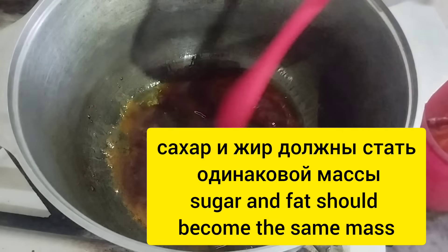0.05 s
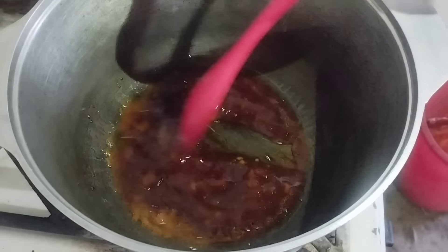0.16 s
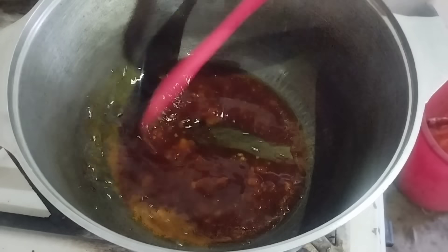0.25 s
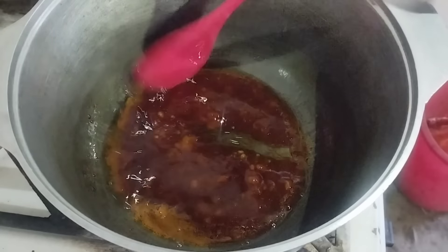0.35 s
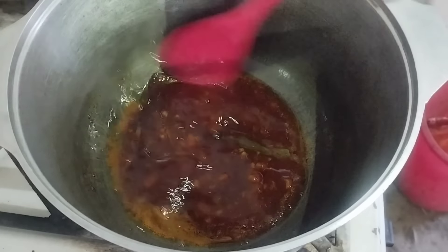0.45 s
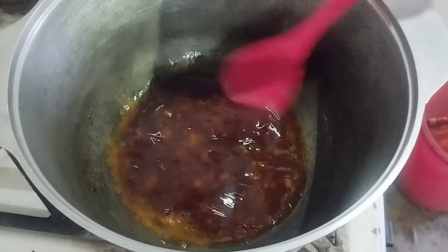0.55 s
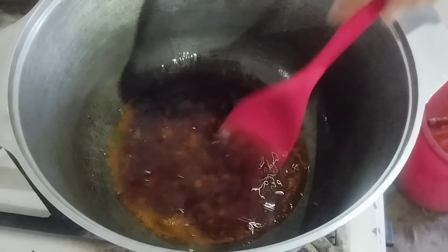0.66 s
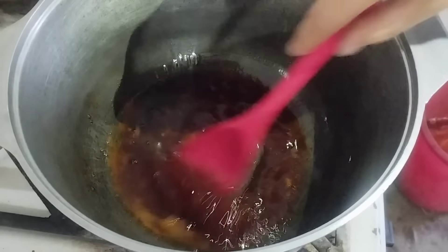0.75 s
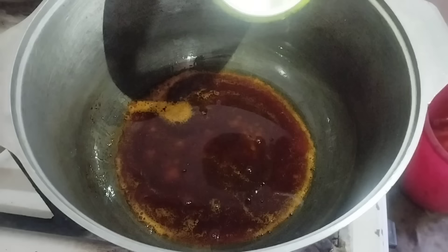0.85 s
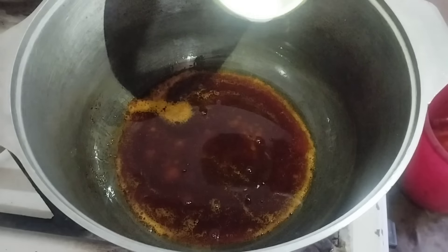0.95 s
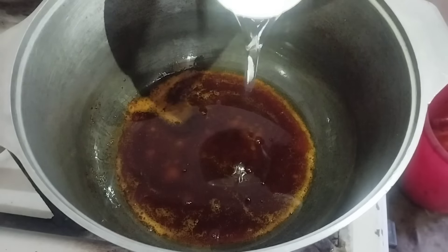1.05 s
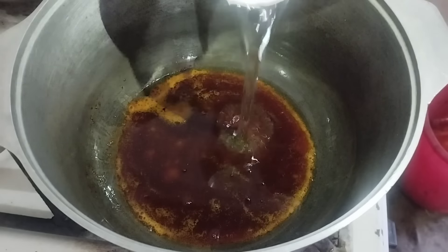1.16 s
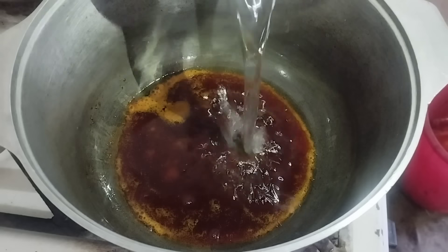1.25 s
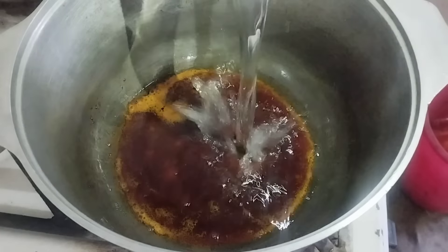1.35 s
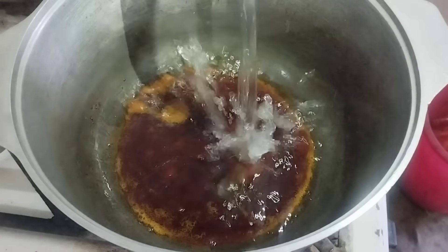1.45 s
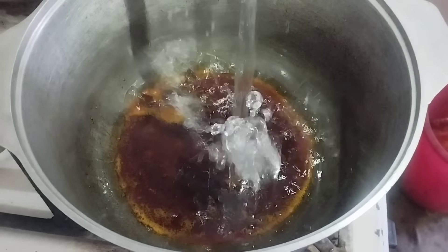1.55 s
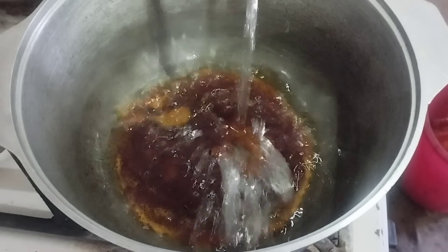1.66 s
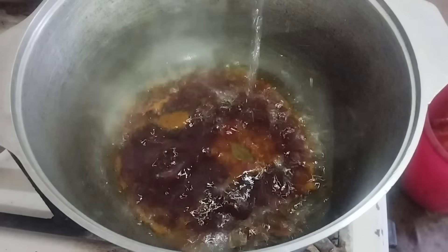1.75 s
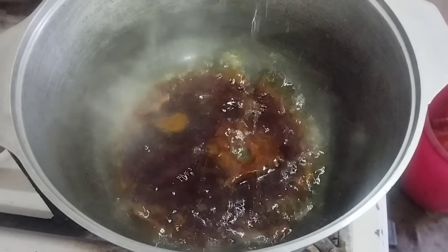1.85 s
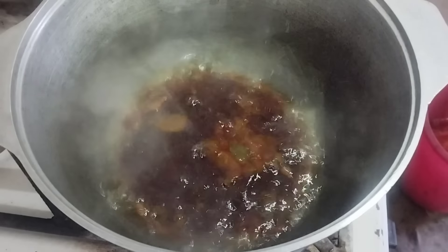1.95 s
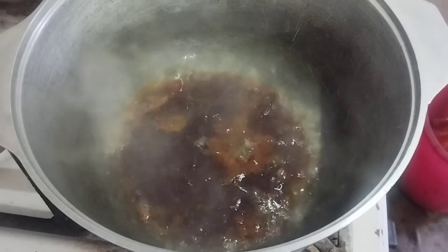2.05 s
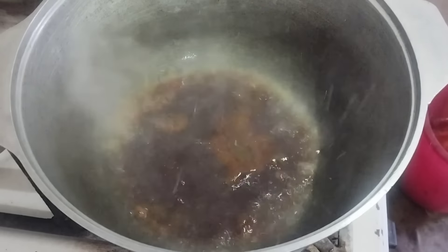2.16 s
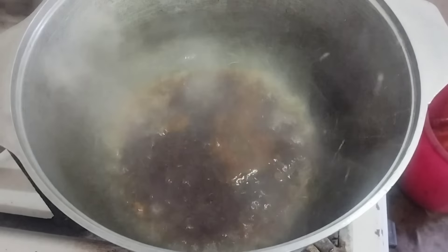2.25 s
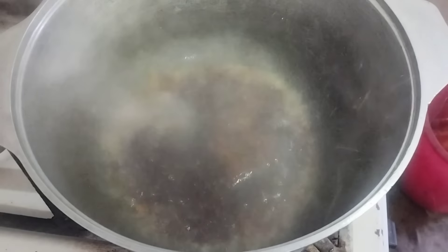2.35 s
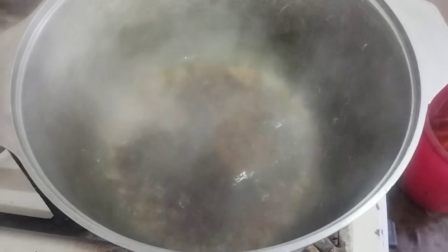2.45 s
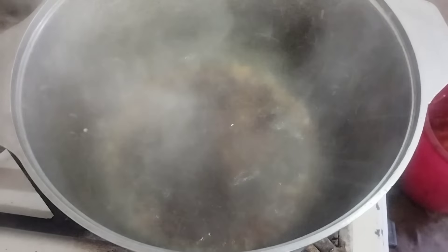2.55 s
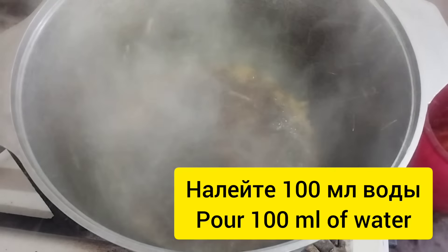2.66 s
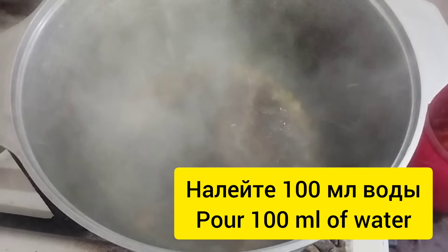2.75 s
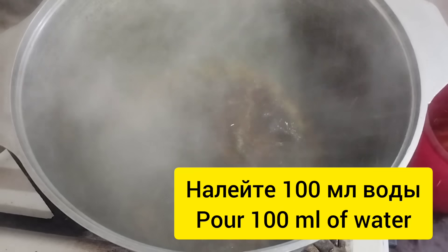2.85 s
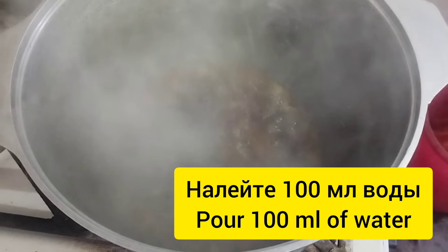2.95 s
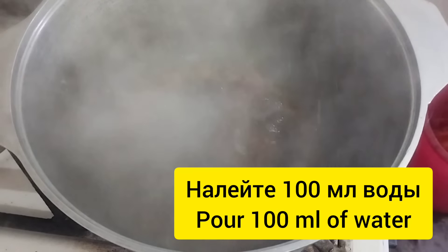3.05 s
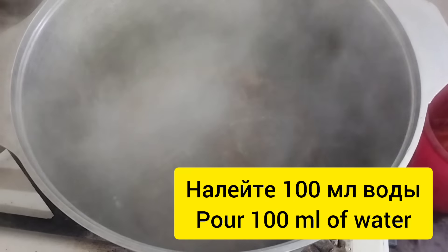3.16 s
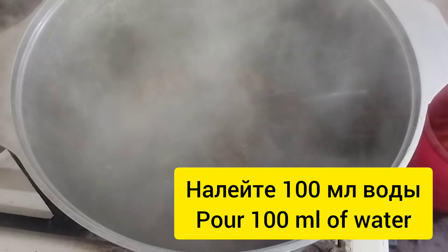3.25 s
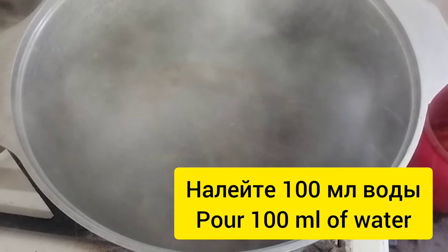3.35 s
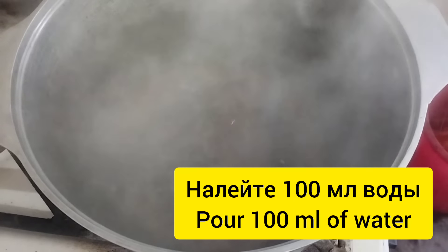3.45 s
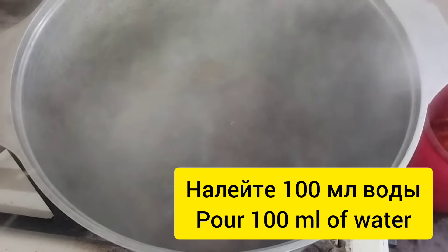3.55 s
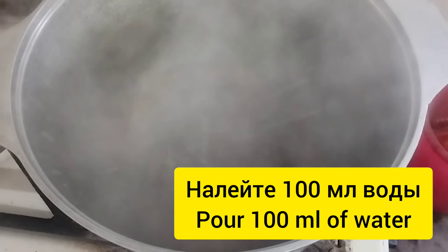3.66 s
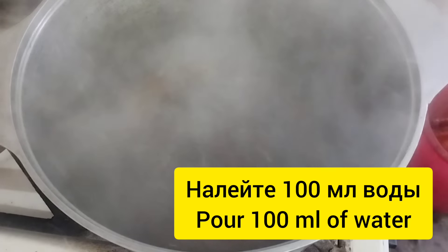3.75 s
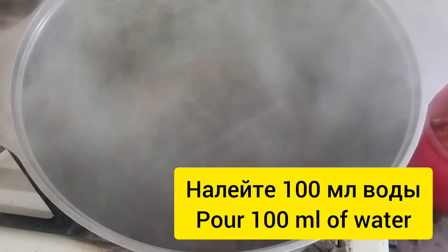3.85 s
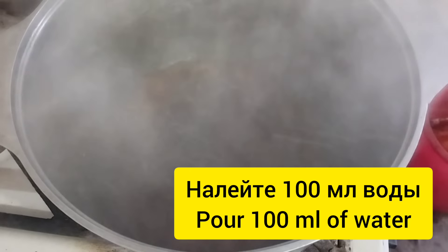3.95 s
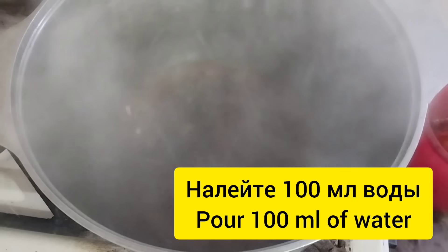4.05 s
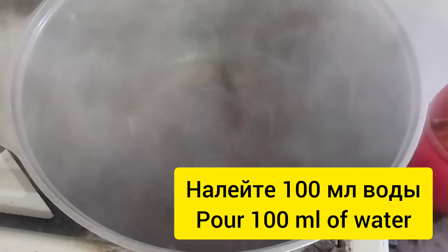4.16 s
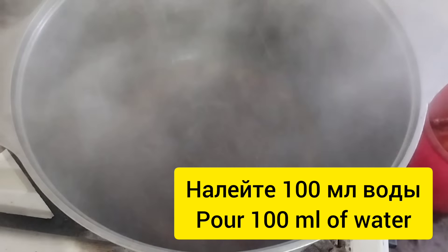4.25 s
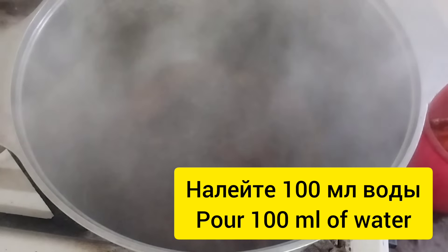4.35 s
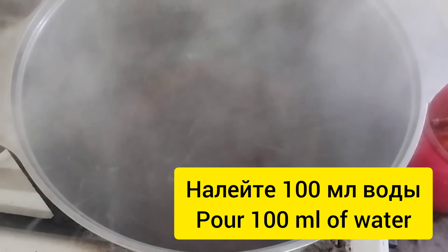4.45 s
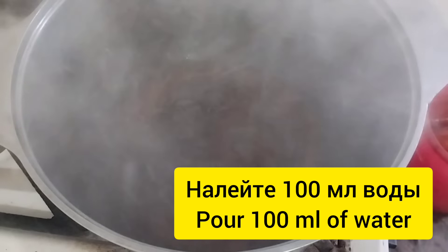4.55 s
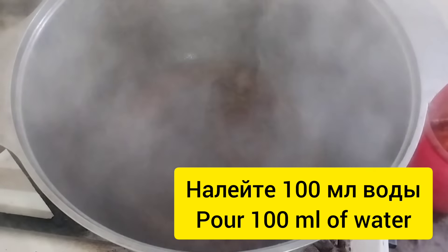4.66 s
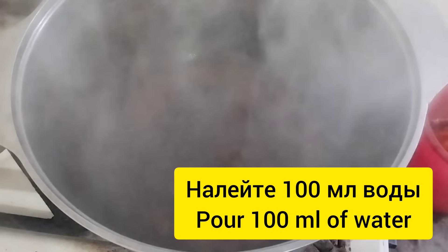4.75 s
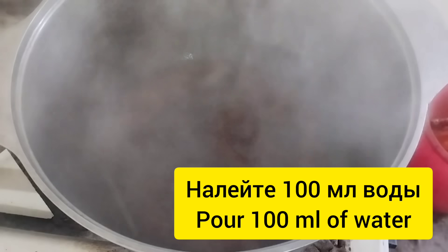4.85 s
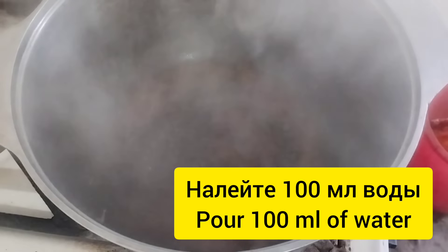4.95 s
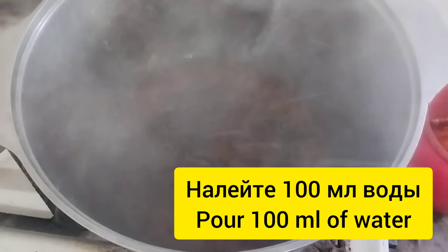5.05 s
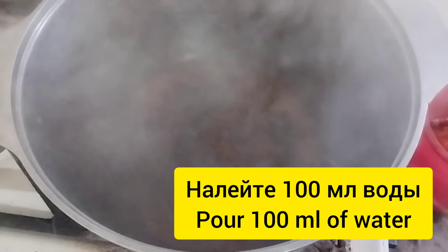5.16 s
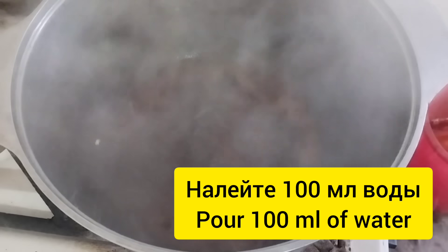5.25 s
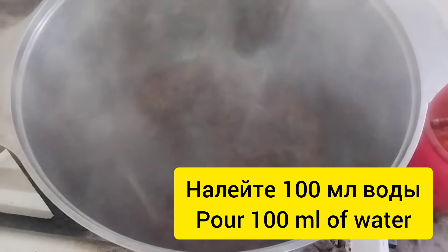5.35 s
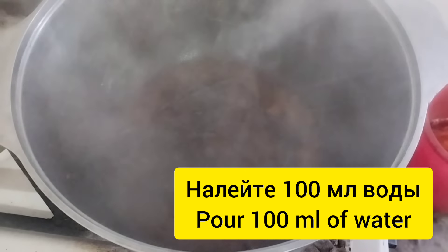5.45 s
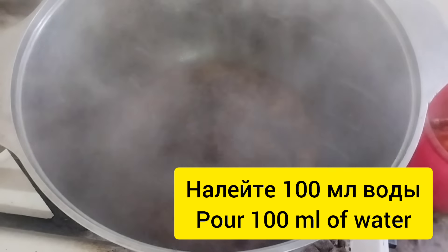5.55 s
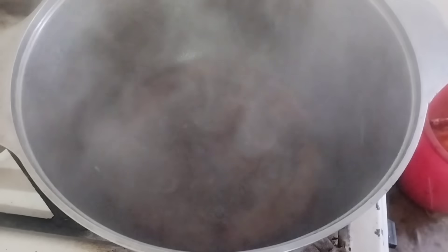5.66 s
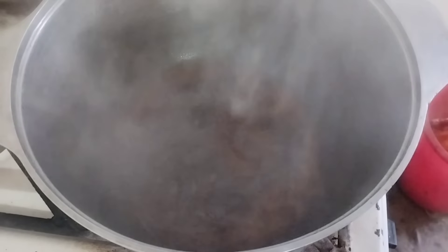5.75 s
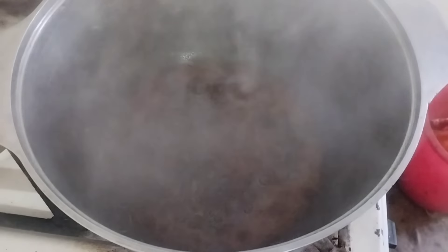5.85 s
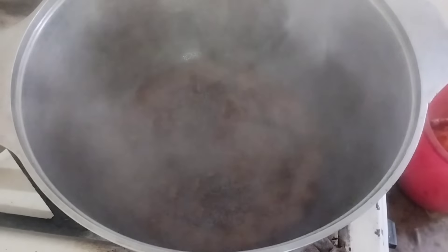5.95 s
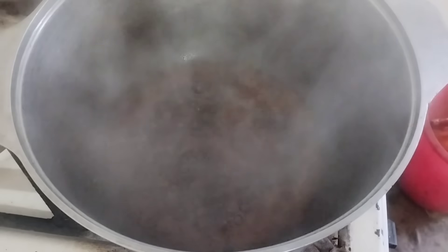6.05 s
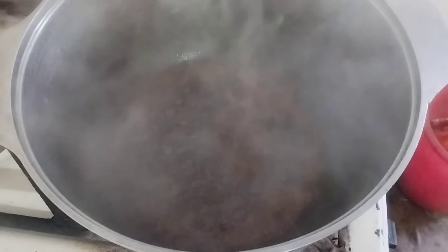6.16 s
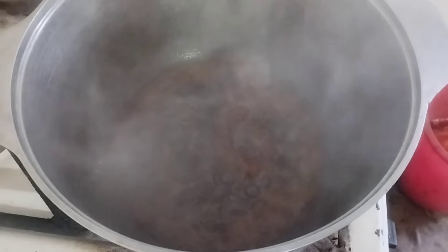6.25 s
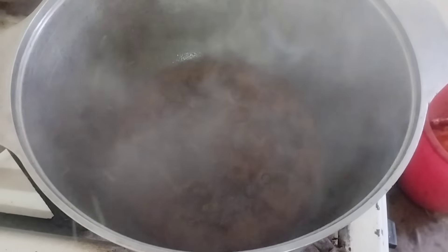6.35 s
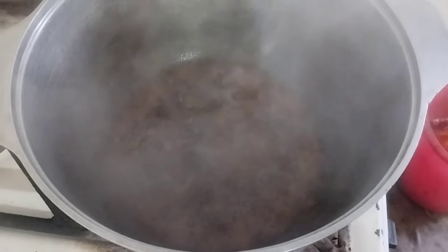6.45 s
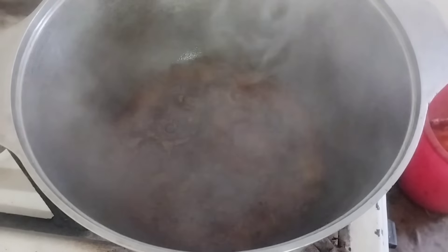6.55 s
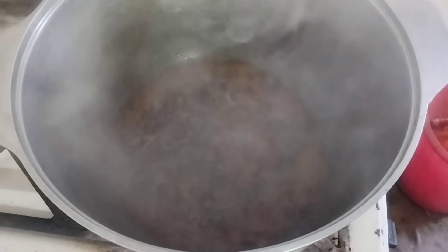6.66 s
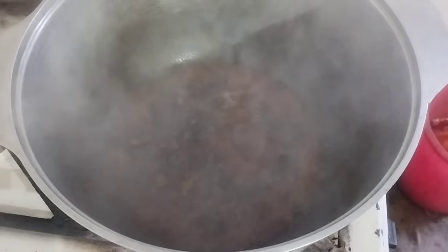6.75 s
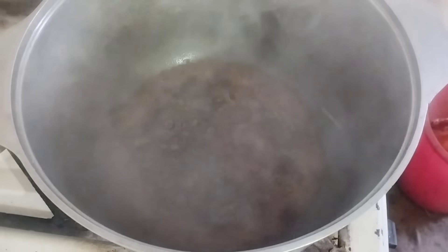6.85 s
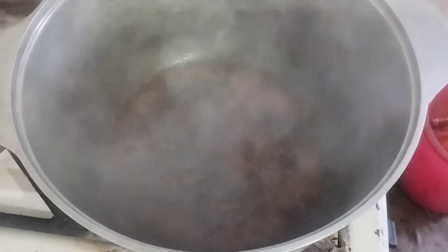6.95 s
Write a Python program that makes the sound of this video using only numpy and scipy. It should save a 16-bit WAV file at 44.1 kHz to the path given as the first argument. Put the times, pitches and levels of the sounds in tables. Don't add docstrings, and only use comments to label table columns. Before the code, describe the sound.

A quiet kitchen hums faintly, a spoon barely brushing a pot. Just after one second, water hits hot syrup and oil: sharp spits, a brief hollow metallic splash, then dense loud sizzling. Sharp pops, crackle and a few low bloops follow. The close stereo microphone, struck by steam, gives abrupt thumps mostly on the left, and loud peaks briefly dip the level.

```python
import sys
import numpy as np
from scipy import signal
from scipy.fft import rfft, irfft, next_fast_len
from scipy.io import wavfile
from scipy.ndimage import uniform_filter1d, minimum_filter1d

SR = 44100
rng = np.random.default_rng(int(sys.argv[2]) if len(sys.argv) > 2 else 0)


def how_loud(loudness_db):
    steps = np.asarray(loudness_db, float) / 20
    return 10 ** steps


def master_out(mix):
    frames = np.transpose(np.atleast_2d(mix))
    ceiling = np.clip(frames, -1, 1)
    pcm = np.round(ceiling * 32767).astype(np.int16)
    wavfile.write(sys.argv[1], SR, pcm)


N = 309141
RIGHT_LAG = 8

# (time [s], fizz level [dB], boil level [dB])
HEAT = [(1.19, -79, -70), (1.225, -62, -77), (1.249, -35.5, -64), (1.31, -47, -77), (1.33, -42.5, -56),
        (1.45, -38.5, -68), (1.5, -32, -38), (1.59, -24, -36.5), (1.69, -27.5, -38.5), (1.79, -24.5, -36.5),
        (2.25, -21.5, -31.5), (3.0, -24, -31), (3.6, -25, -35), (4.15, -27, -35.5), (5.0, -25.5, -35),
        (5.8, -25, -35), (6.3, -25.5, -35), (7.01, -24.5, -37)]
# (frequency [Hz], level [dB])
FIZZ_SPECTRUM = [(30, -2.5), (100, -16), (300, -10.5), (900, -7), (1600, -2.5), (2100, -2.5), (3000, 1),
                 (5000, 1.5), (16000, -3.5)]
# (frequency [Hz], width [Hz], level [dB])
POT_MODES = [(398, 8, 2), (569, 57, 5), (624.4, 38, 7), (763, 340, -1), (1230, 280, -2), (1968, 70, 4),
             (1635, 52, -4)]
# (time [s], peak level [dB], pitch [Hz], pot thump minus peak [dB])
SPITS = [(1.1982, -45, 6210, -36), (1.2174, -53, 3100, -25), (1.225, -40, 5300, -35),
         (1.2363, -33, 5700, -27), (1.2511, -44, 5260, -32), (1.282, -32, 4910, -34),
         (1.3022, -24.5, 5400, -48), (1.3214, -43, 4610, -7), (1.3404, -33, 5450, -30),
         (1.3524, -49, 4570, -28), (1.3652, -32, 4520, -17), (1.374, -38, 5950, -21),
         (1.3931, -34, 6890, -11), (1.4034, -35, 3360, -31), (1.4146, -31, 4600, -22),
         (1.485, -30, 4710, -15), (1.5357, -28, 2680, -24), (1.5488, -23, 2710, -23)]
# (time [s], peak level [dB], pitch [Hz], pot thump minus peak [dB])
POPS = [(1.9455, -14, 3400, -17), (2.3376, -16, 5700, -5), (2.5401, -13, 4600, -10),
        (2.6434, -20, 5640, -20), (2.815, -16, 4240, -5.5), (3.1173, -19, 6230, 0.5),
        (3.1577, -14, 4600, -14), (3.1827, -11.5, 4760, -10), (3.2081, -15, 4400, -15),
        (3.258, -24.5, 5800, 1.5), (3.2798, -20.5, 5700, -13), (3.4905, -21.5, 5600, 0.5),
        (3.6137, -26.5, 5600, 1), (3.7064, -24, 3660, -5.5), (3.8511, -17, 5800, -1),
        (3.9918, -22, 5040, -1.5), (4.0427, -22.5, 5120, 3.5), (4.0826, -12.5, 4970, -11.5),
        (4.2702, -19, 5500, -13), (4.3994, -14, 5140, -21), (4.4194, -19, 4270, -3.5),
        (4.4962, -12, 4360, -17), (4.5084, -23.5, 4370, 5), (4.5296, -18, 5100, -14),
        (5.0095, -14.5, 5060, -6), (5.2155, -24, 5360, -2), (5.4186, -19.5, 5200, -6),
        (5.7434, -31, 4360, 2.5), (5.7788, -23.5, 6160, 2), (6.1194, -18, 5130, -5)]
# (time [s], size [full scale])
SNAPS_IN = [(1.8748, .3), (2.0127, .6), (2.2476, .43), (2.2866, .6), (2.2929, .22), (2.3165, .72),
            (2.3392, .14), (2.4068, .14), (2.4458, .14), (2.5065, .57), (2.541, .74), (2.6771, .73),
            (2.751, .22), (2.7668, .96), (2.8195, .56), (2.9396, .2), (2.9573, .18), (2.9782, .56),
            (3.004, .59), (3.1192, .9), (3.2589, .56), (3.3868, .54), (3.9659, .18), (3.9932, .77),
            (4.0285, .5), (4.1623, .13), (4.5501, .23), (4.8825, .68), (5.2784, .84), (6.3886, .62)]
# (time [s], size [full scale])
SNAPS_OUT = [(2.0303, .09), (2.253, .14), (2.2621, .85), (2.3514, .15), (2.4371, .3), (2.5174, .23),
             (2.6956, .15), (2.7079, .49), (2.7378, .25), (2.7718, 1.02), (2.8458, .22), (2.946, .32),
             (2.9941, .12), (3.0104, .49), (3.0181, .14), (3.0254, .18), (3.0331, .2), (3.1573, .25),
             (3.2757, .79), (3.4054, .33), (3.936, .75), (4.0344, .38), (4.4449, 1.12), (4.7495, .12),
             (4.9405, .34), (5.3877, .16)]
# (time [s], signed size [full scale])
JUMPS_RIGHT = [
    (2.5415, -0.23),
    (4.0829, 0.1),
]
# (time [s], wall level [dB], wall pitch [Hz], cavity level [dB], cavity pitch [Hz])
POUR = [
    (1.34, -61, 1140, -72, 566),
    (1.402, -67, 1140, -29, 544),
    (1.5, -69, 1100, -32.5, 520),
    (1.528, -26, 1120, -30, 563),
    (1.574, -30, 1100, -21.5, 630),
    (1.634, -42, 1130, -48, 540),
    (1.74, -28, 1170, -28, 583),
    (1.774, -32, 1150, -38, 600),
    (2.0, -49, 1230, -29.5, 650),
]
# (time [s], peak level [dB], pitch [Hz])
BLOOPS = [
    (2.944, -18, 417),
    (3.112, -11.5, 255),
    (5.301, -20.5, 336),
    (5.328, -23, 346),
    (5.563, -18.5, 327),
    (5.586, -21, 340),
    (5.594, -40, 398),
]
# (time [s], level [dB])
STIR = [
    (0.07, -78),
    (0.134, -63),
    (0.192, -84),
    (0.198, -75),
    (0.24, -91),
]
# (frequency [Hz], width [Hz], level [dB])
DRONE = [(66, 21, -62), (355, 26, -68), (1770, 60, -79)]
# (frequency [Hz], level [dB])
HUM_SPECTRUM = [(20, 1), (65, -7), (120, -10), (250, -14.5), (370, -13), (550, -22), (1500, -32),
                (1800, -32), (2200, -32.5), (5500, -38.5), (6300, -31.5), (7200, -38.5), (12000, -42.5),
                (15500, -40)]
# (frequency [Hz], shared power [0 to 1])
LIKENESS = [(170, 0.65), (700, 0.98), (1200, 0.98), (2200, 0.04), (3000, 0.046), (16000, 0.054)]
# (frequency [Hz], level [dB])
PORT_LEFT = [(3000, 2.5), (5200, 2.5), (6800, 2), (7700, -2), (8150, -21.5), (8700, -1), (9600, 3),
             (11300, 1.5), (12500, 8), (15500, 11)]
# (frequency [Hz], level [dB])
PORT_RIGHT = [(3000, 1.5), (5200, 5.5), (6800, 4.5), (7700, -0.5), (8150, -4), (8700, -4), (9600, -7),
              (10800, -11), (11300, -34), (11900, -2.5), (15500, 7)]


def evened(x):
    return x / np.sqrt(np.mean(x ** 2) + 1e-20)


def read(points, hz):
    f, value = np.transpose(points)
    return np.interp(np.log(hz + 1), np.log(f + 1), value)


def colour(x, points):
    log_gain = np.log(how_loud(read(points, abs(np.fft.fftfreq(4096, 1 / SR)))))
    spectrum = np.exp(np.conj(signal.hilbert(log_gain)))
    taps = np.fft.ifft(spectrum).real[:2048]
    return signal.oaconvolve(x, taps)[:N]


def pair(x):
    size = next_fast_len(N)
    same = np.clip(read(LIKENESS, np.fft.rfftfreq(size, 1 / SR)), 0, 1)
    z = rfft(x, size)
    return irfft(np.sqrt(same) * z[0] + np.sqrt(1 - same) * z[1:], size)[:, :N]


def clicks(per_s, spread_db, channels):
    size = how_loud(spread_db * np.minimum(rng.exponential(1, (channels, N)), 4))
    return size * (rng.random((channels, N)) < per_s / SR)


def fade(x, ms):
    r = np.exp(-1000 / (ms * SR))
    return signal.lfilter([1 - r], [1, -r], x)


def slow_noise(ms):
    return evened(fade(fade(rng.standard_normal(N), ms), ms))


def gain_curve(s, db):
    return how_loud(np.interp(np.arange(N) / SR, s, db, left=-120, right=-120))


def pot(x):
    out = 0
    for hz, width, db in POT_MODES:
        pole = np.exp((-np.pi * width + 2j * np.pi * hz) / SR)
        out = out + how_loud(db) * 2 * signal.lfilter([1 - abs(pole)], [1, -pole], x).imag
    return signal.sosfilt(signal.butter(2, 220, "high", fs=SR, output="sos"), out)


def ring(hz, ms):
    turn = np.exp(2j * np.pi * np.cumsum(hz) / SR)
    noise = pair(rng.standard_normal((3, N)))
    return evened((turn * fade(fade(noise / turn, ms), ms)).real)


def fizz():
    s, db, boil_db = np.transpose(HEAT)
    flares = fade(clicks(440, 4.0, channels=1)[0] ** 2, 6.0)
    power = (1 + 0.5 * flares / flares.mean()) * how_loud(0.6 * slow_noise(3.6))
    hiss = pair(rng.standard_normal((3, N))) * np.sqrt(power)
    hiss = evened(np.array([colour(x, FIZZ_SPECTRUM) for x in hiss]))
    body = signal.lfilter(*signal.butter(1, 1800, fs=SR), hiss)
    fullness = gain_curve(s, np.clip(0.69 * (boil_db - db + 9.0), -12, 0))
    return gain_curve(s, db + 2.5) * (hiss - (1 - fullness) * body)


def boil():
    s, _, db = np.transpose(HEAT)
    knocks = clicks(700, 2.5, channels=3) * rng.standard_normal((3, N))
    swell = how_loud(1.2 * slow_noise(30.0))
    blows = evened(knocks) + 0.78 * rng.standard_normal((3, N))
    return gain_curve(s, db + 0.5) * swell * evened(pot(pair(blows)))


def pops():
    crack, spray, thump = np.zeros((3, 2, N + 900))
    t = np.arange(900) / SR
    knock = t / 0.00015 * np.exp(-t / 0.00016) * np.sin(2 * np.pi * 1900 * t) * 2
    for s, db, hz, thump_db in SPITS + POPS + small_pops():
        at = round((s + 0.0006) * SR)
        tone = t / 0.00008 * np.exp(-t / 0.00008) * np.sin(2 * np.pi * hz * t) * 2
        echoes = rng.standard_normal((2, len(t))) * 0.075 * np.exp(-t / 0.003)
        echoes[:, 0] += 1
        knock_db = db - 10 + 0.63 * (thump_db + 12.5) + 8
        burst = how_loud(db + 12.5) * tone + how_loud(knock_db) * knock
        crack[:, at:at + len(t)] += signal.fftconvolve(burst[None], echoes)[:, :len(t)]
        mist = rng.standard_normal((2, len(t))) * np.exp(-t / 0.00026)
        spray[:, at:at + len(t)] += how_loud(db - 10 + 18) * mist
        thump[:, at] += how_loud(db + thump_db + 34.0)
    spray = signal.sosfilt(signal.butter(2, 6000, "high", fs=SR, output="sos"), spray)
    crack[0] = how_loud(-1.5) * np.roll(crack[0], RIGHT_LAG)
    return (crack + spray + pot(fade(thump, 0.054)))[:, :N]


def small_pops():
    from_s, to_s, per_s = 1.5, 5.9, 6
    when, size, pitch, depth = rng.random((60, 4)).T
    s = from_s + np.cumsum(-np.log(when)) / per_s
    rows = np.c_[s, -23.5 + 5 * (size - 0.5), 3500 + 2500 * pitch, -22 + 9 * depth]
    return list(rows[s < to_s])


def crackle():
    s, db, _ = np.transpose(HEAT)
    t, out = np.arange(200) / SR, np.zeros((2, N))
    for hz in np.geomspace(2200, 7000, num=8):
        snap = np.exp(-t * hz / 1.22) * np.sin(2 * np.pi * hz * t)
        near = clicks(20, 3.5, channels=2)
        out += signal.oaconvolve(near + 0.05 * near[::-1], snap[None], axes=1)[:, :N]
    return gain_curve(s, db - 9.0) * evened(out)


def jumps():
    out = np.zeros((2, N))
    for port, sign, table in ((0, -1, SNAPS_IN), (0, 1, SNAPS_OUT), (1, 1, JUMPS_RIGHT)):
        s, size = np.transpose(table)
        out[port, np.round((s + 0.0007) * SR).astype(int)] = sign * size
    r = np.exp(-20.1 / SR)
    return signal.lfilter([1, -1], [1, -2 * r, r ** 2], uniform_filter1d(out, size=44))


def pour():
    s, wall_db, wall_hz, cavity_db, cavity_hz = np.transpose(POUR)
    t = np.arange(N) / SR
    hz = np.interp(t, s, wall_hz)
    wall = gain_curve(s, wall_db - 4.5) * ring(hz, 1.9)
    overtone = gain_curve(s, wall_db - 0.5 - 40 * (s - 1.5)) * ring(2.48 * hz, 0.74)
    cavity = gain_curve(s, cavity_db - 7.0) * ring(np.interp(t, s, cavity_hz), 1.44)
    return wall + overtone + cavity


def bloops():
    out, t = np.zeros(N), np.arange(1800) / SR
    for s, db, hz in BLOOPS:
        envelope = (1 - np.exp(-t / 0.00059)) * np.exp(-t / 0.0052)
        tone = np.sin(2 * np.pi * hz * t * (1 + 4 * t)) * envelope
        out[round(s * SR):][:len(t)] += how_loud(db - 0.5) * tone
    return out


def spoon():
    return gain_curve(*np.transpose(STIR)) * ring(np.full(N, 1150.0), 0.37)


def drone():
    out = 0
    for hz, width, db in DRONE:
        out = out + how_loud(db) * ring(np.full(N, hz), 1000 / (2 * np.pi * width))
    return out


def hum():
    waver = how_loud(0.74 * slow_noise(35.0))
    noise = np.array([colour(x, HUM_SPECTRUM) for x in pair(rng.standard_normal((3, N)))])
    return how_loud(-56) * waver * evened(noise)


def ducking(loud):
    knee_db, hold_s, recover_db_per_s = [[-14], [-9]], 0.079, 186
    fall = np.arange(N) * recover_db_per_s / SR
    hold = round(hold_s * SR / 2)
    peak_db = -minimum_filter1d(-20 * np.log10(abs(loud) + 1e-6), size=2 * hold + 1, origin=hold)
    held_db = np.maximum.accumulate(peak_db + fall, axis=1) - fall
    left, right = uniform_filter1d(np.maximum(held_db - knee_db, 0), size=300, origin=149)
    return how_loud([-0.46 * left, -0.17 * right - 0.12 * left])


def starve(x):
    hz, _, z = signal.stft(x, SR, nperseg=1024, noverlap=768)
    power = uniform_filter1d(abs(z) ** 2, size=5)
    band = np.arange(len(hz)) // 7
    near = np.add.reduceat(power, np.arange(0, len(hz), 7), axis=1)[:, band] / 7
    wide = uniform_filter1d(power, size=140, axis=1)
    chance = rng.standard_normal((3, band[-1] + 1, z.shape[2] // 6 + 1))
    chance = np.repeat(chance, 6, axis=2)[:, band, :z.shape[2]]
    strict = how_loud(4 * chance[0] + 2.5 * chance[1:]) * np.where(hz < 8900, 0.4, 0.14)[:, None]
    treble = ((hz > 7000) & (hz < 12500))[:, None]
    weak = (near < wide * strict) & (wide > 1e-9) & treble
    return signal.istft(z * np.where(weak, 0.003, 1), SR, nperseg=1024, noverlap=768)[1][:, :N]


def scene():
    steps, bursts = jumps(), pops()
    gain = ducking(abs(steps) + [[0.4], [1.2]] * abs(bursts))
    frying = (fizz() + boil() + crackle() + bursts) * gain
    left, right = frying + pour() + bloops() + spoon() + drone() + hum()
    right = np.r_[np.zeros(RIGHT_LAG), right][:N]
    return np.array([colour(left, PORT_LEFT), colour(right, PORT_RIGHT)]) + steps


def roll_off(x):
    return signal.sosfilt(signal.butter(12, 17040, fs=SR, output="sos"), x)


def record(dry):
    ceiling = np.sign(dry) * (0.75 + 0.13 * np.tanh((abs(dry) - 0.75) / 0.13))
    x = np.where(abs(dry) > 0.75, ceiling, dry)
    edge = signal.firwin(401, 15800, window=("kaiser", 9), fs=SR)
    x = signal.oaconvolve(starve(x), edge[None], "same")
    return roll_off(x)


dry = scene()
out = record(dry)
master_out(out)
```